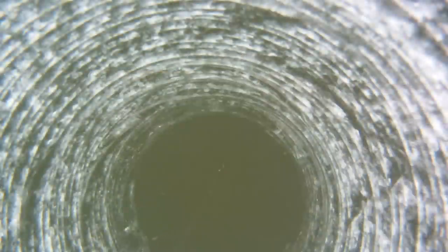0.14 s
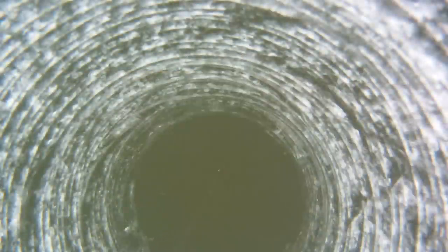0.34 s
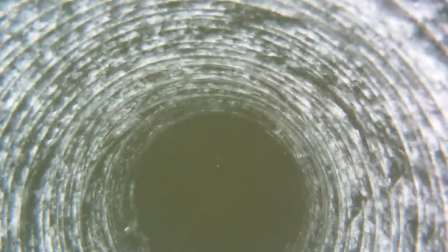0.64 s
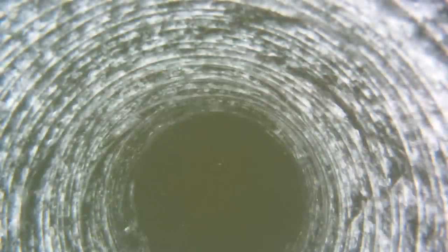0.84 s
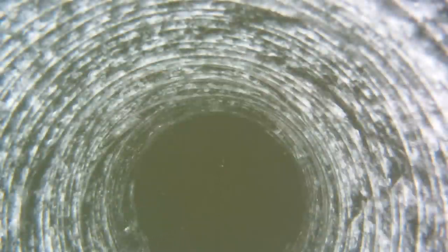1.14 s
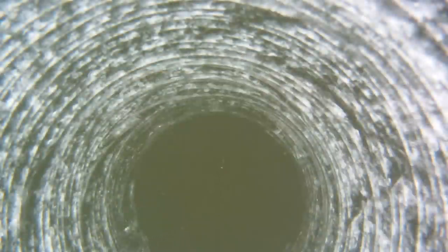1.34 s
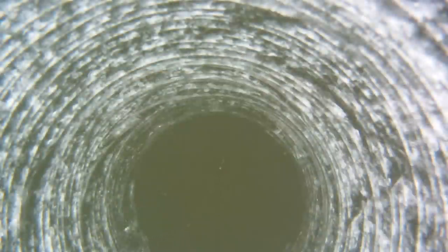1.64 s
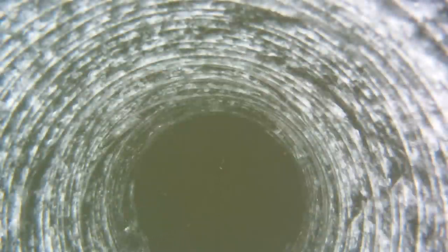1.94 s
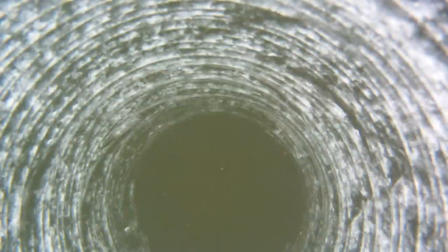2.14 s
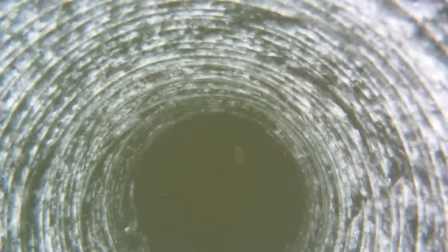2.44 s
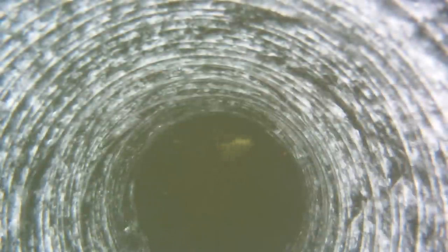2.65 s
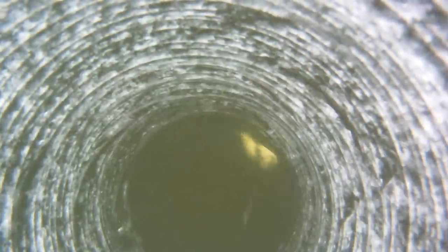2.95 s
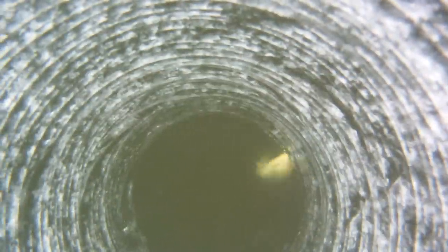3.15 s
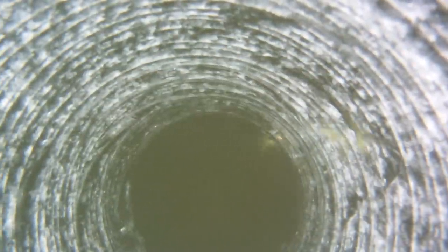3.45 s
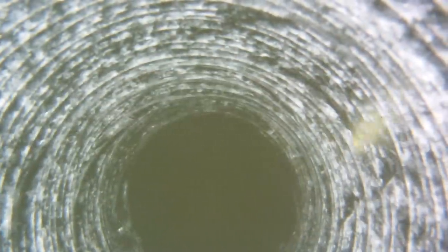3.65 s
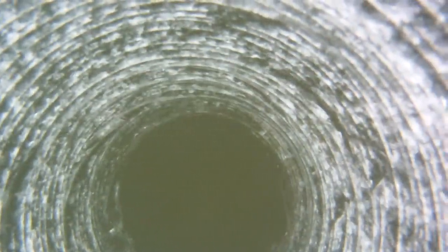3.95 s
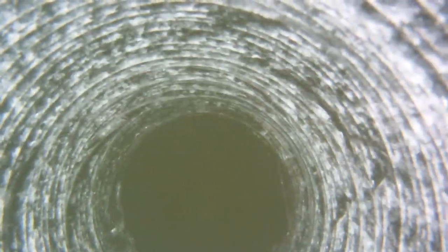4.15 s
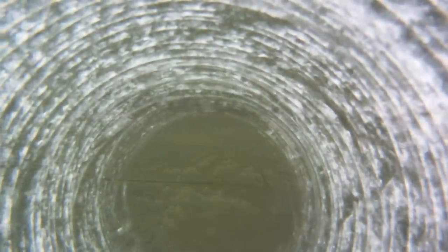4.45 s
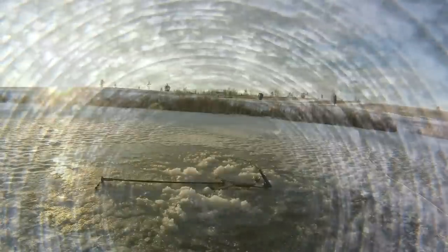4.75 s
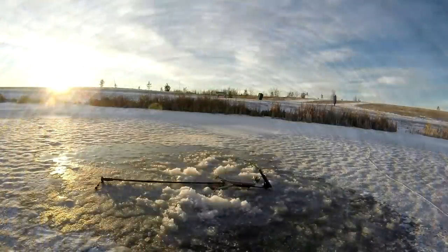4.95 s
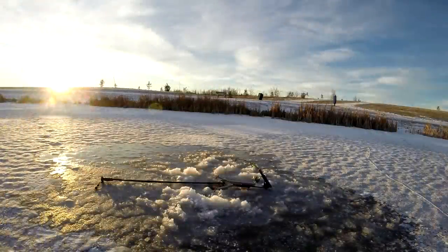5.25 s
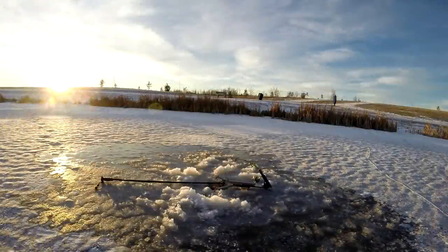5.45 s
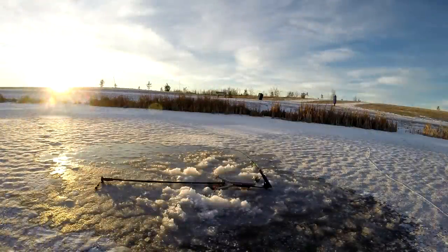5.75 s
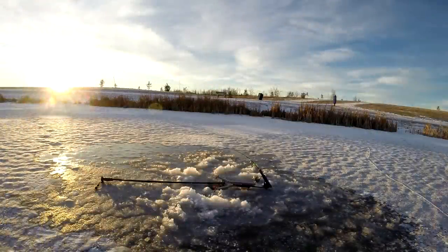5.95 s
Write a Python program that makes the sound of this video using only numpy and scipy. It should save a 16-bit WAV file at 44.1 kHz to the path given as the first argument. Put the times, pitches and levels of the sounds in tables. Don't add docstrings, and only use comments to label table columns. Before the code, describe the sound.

At an ice-fishing hole, very soft hiss and a few barely audible taps. Suddenly the rod jerks with hard cracks, bright bell jingle and rough scraping, then drags and rattles more quietly with scattered tinkles and low thumps through the close microphone's mount. The sound crossfades to a distant hum over an open frozen pond, where the rod trips with a clatter and the bell clinks sharply and rings on.

```python
import sys
import numpy as np
from scipy import signal
from scipy.fft import rfft, irfft
from scipy.io import wavfile
from scipy.ndimage import uniform_filter1d

SR = 44100
rng = np.random.default_rng(int(sys.argv[2]) if len(sys.argv) > 2 else 0)


def transcribe(signal):
    frames = np.atleast_2d(signal).T
    limited = np.clip(frames, -1, 1)
    pcm = np.round(limited * 32767).astype(np.int16)
    wavfile.write(sys.argv[1], SR, pcm)


def to_linear_factor(level_db):
    exponent = np.asarray(level_db, float) / 20
    return 10 ** exponent


N = 268561


def evened(x):
    return x / np.sqrt(np.mean(x ** 2) + 1e-20)


def add(mix, s, sound):
    part = mix[round(s * SR):][:len(sound)]
    part += sound[:len(part)]


def resonate(x, hz, width):
    r = np.exp(-np.pi * width / SR)
    return signal.lfilter([1 - r], [1, -2 * r * np.cos(2 * np.pi * hz / SR), r * r], x)


RIM_HZ = 7000
LINGER_DB = -27


def ring_shell(strikes, modes, free_s):
    out, t = np.zeros(N), np.arange(6000) / SR
    waits = np.diff([row[0] for row in strikes] + [np.inf])
    damped_db = np.maximum(-60 * np.maximum(t - free_s, 0) / 0.04, LINGER_DB)
    decay_db = -60 * t / 0.11
    attack = np.sin(np.pi / 2 * np.minimum(t / 0.0015, 1)) ** 2
    for (s, db), wait in zip(strikes, waits):
        detune = 1 + 0.008 * (rng.random() - 0.5)
        ring = np.zeros(len(t))
        for hz, mode_db in modes:
            level_db = mode_db + damped_db * (hz < RIM_HZ)
            ring += to_linear_factor(level_db) * np.sin(2 * np.pi * (hz * detune * t + rng.random()))
        until_next = np.clip((wait - t) / 0.0015 + 1, 0, 1)
        add(out, s - 0.001, to_linear_factor(db + decay_db) * ring * attack * until_next)
    flutter = uniform_filter1d(uniform_filter1d(rng.standard_normal(N), size=120), size=120)
    return out * to_linear_factor(2.5 * evened(flutter))


# (frequency [Hz], level [dB])
LOW_SHELL_MODES = [(3860, 0), (3890, -8), (9460, -29), (7990, -39)]
HIGH_SHELL_MODES = [(4104, 0), (4076, -8), (10150, -28), (10310, -31), (8130, -37)]
# (time [s], peak level [dB])
LOW_TOUCHES = [
    (2.2845, -62),
    (2.3426, -55),
    (2.3989, -64),
]
LOW_STRIKES_JERK = [(2.5945, -18.5), (2.6061, -18), (2.6229, -22), (2.7784, -39), (2.7944, -38),
                    (2.834, -42), (2.8534, -44), (2.877, -47), (2.957, -55), (3.123, -37), (3.183, -58),
                    (3.203, -46), (3.331, -44), (3.3464, -49)]
LOW_STRIKES_REEL = [(3.418, -41), (3.5464, -36), (3.567, -41), (3.588, -43.5), (3.7409, -45), (3.767, -43),
                    (3.872, -39), (3.8923, -33), (3.923, -34), (3.9304, -30), (3.986, -39), (3.9984, -48),
                    (4.0568, -50), (4.107, -37), (4.1355, -29.5), (4.1782, -32.5), (4.243, -41.5),
                    (4.2844, -35), (4.3024, -30.5), (4.348, -51), (4.4333, -39.5), (4.478, -33)]
LOW_STRIKES_SETTLE = [
    (4.6162, -28),
    (4.6506, -31),
    (4.67, -31),
    (4.682, -33.5),
    (4.72, -43),
    (4.737, -44.5),
    (4.765, -51),
    (4.782, -49),
    (4.797, -47),
    (4.8527, -52),
]
# (time [s], peak level [dB])
HIGH_STRIKES_NEAR = [(2.597, -23.5), (2.6205, -34), (2.7577, -50), (2.793, -39), (2.809, -40),
                     (2.8539, -50), (3.9693, -48), (4.1343, -50), (4.1514, -37.5), (4.1786, -34),
                     (4.2448, -45), (4.6179, -57), (4.632, -40), (4.8144, -57)]


def near_bell():
    low, high = LOW_SHELL_MODES[:2], HIGH_SHELL_MODES[:2]
    out = ring_shell(LOW_TOUCHES, low, free_s=0.0023)
    out += ring_shell(LOW_STRIKES_JERK + LOW_STRIKES_REEL + LOW_STRIKES_SETTLE, low, free_s=0.0091)
    return out + ring_shell(HIGH_STRIKES_NEAR, high, free_s=0.044)


# (time [s], peak level [dB])
LOW_STRIKES_WIDE = [(5.4281, -61), (5.4849, -58), (5.7325, -24), (5.7378, -12), (5.7478, -18),
                    (5.7648, -19), (5.7705, -19), (5.7846, -30.5), (5.8137, -33), (5.8493, -30.5),
                    (5.861, -28), (5.8665, -23.5), (5.8985, -30.5), (5.9104, -35), (5.923, -33),
                    (5.9372, -45), (5.9675, -35), (5.995, -38), (6.03, -43), (6.0448, -38), (6.0604, -42),
                    (6.0744, -36)]
HIGH_STRIKES_WIDE = [(5.738, -20), (5.7522, -29), (5.7618, -35), (5.7884, -32), (5.821, -39), (5.8556, -29),
                     (5.8794, -25.5), (5.8978, -28), (5.9366, -28.5), (5.9697, -33), (5.996, -38.5),
                     (6.028, -44), (6.0487, -39), (6.0672, -47)]


def wide_bell():
    out = ring_shell(LOW_STRIKES_WIDE, LOW_SHELL_MODES, free_s=0.0094)
    return out + ring_shell(HIGH_STRIKES_WIDE, HIGH_SHELL_MODES, free_s=0.047)


def response(body, widen, tick_db):
    t = np.arange(2048) / SR
    modes = []
    for k, (hz, width, db) in enumerate(body):
        decay = np.exp(-np.pi * width * widen * t)
        modes.append((-1) ** k * to_linear_factor(db) * width * decay * np.sin(2 * np.pi * hz * t))
    modes = np.array(modes)
    tick = to_linear_factor(tick_db) * np.diff(t == 0, prepend=0)
    return np.vstack([modes / np.linalg.norm(modes.sum(0)), tick])


CRACK_DB = -3.5


def knock(knocks, body, rattle_s=0.024, widen=0.77, tick_db=-14, own_db=-2, own_width=160, lift_db=-2):
    modes, out, t = response(body, widen, tick_db), np.zeros(N), np.arange(4000) / SR
    for s, db, hz, *own_t60 in knocks:
        t60 = own_t60[0] if own_t60 else rattle_s
        blow = rng.standard_normal(len(t)) * to_linear_factor(-60 * t / max(t60, 0.004))
        blow[:8] += to_linear_factor(CRACK_DB) * np.linalg.norm(blow) * np.hanning(8) / 2
        ring = to_linear_factor(3 * rng.standard_normal(len(modes))) @ modes
        sound = evened(signal.fftconvolve(blow, ring)[:len(t)])
        own_ring = resonate(resonate(blow, hz, 2 * own_width), hz, 2 * own_width)
        sound += to_linear_factor(own_db) * evened(own_ring)
        add(out, s - 0.0004, to_linear_factor(db + lift_db) * sound / abs(sound).max())
    return out


GRIP_S, LIFT_S, LIGHT_DB = 0.014, 0.014, -30


def pressure(strokes):
    out = np.zeros(N)
    for start, end, grip_db, lift_db in strokes:
        t = np.arange(start, end + LIFT_S, 1 / SR)
        times = [start, start + GRIP_S, end, end + LIFT_S]
        levels_db = [grip_db + LIGHT_DB, grip_db, lift_db, lift_db + LIGHT_DB]
        add(out, start, to_linear_factor(np.interp(t, times, levels_db)))
    return out


SLIP_SPREAD_DB, SLIPS_PER_S = 3.6, 3500


def slide(strokes, body, widen, tick_db, slide_db):
    modes = response(body, widen, tick_db)
    start = strokes[0][0]
    span = round((strokes[-1][1] - start) * 10 + 2) * 4500
    slips = to_linear_factor(SLIP_SPREAD_DB * np.minimum(rng.exponential(1, span), 3))
    slips *= rng.random(span) < SLIPS_PER_S / SR
    slips *= rng.choice([-1., 1.], span)
    wander = uniform_filter1d(rng.standard_normal((len(modes), span // 100)), size=7)
    wander_db = 2.7 * np.repeat(evened(wander), 100, axis=1)
    scrape = signal.oaconvolve(slips * to_linear_factor(wander_db), modes, axes=1)[:, :span].sum(0)
    sliding = np.zeros(N)
    add(sliding, start, evened(scrape))
    return pressure(strokes) * to_linear_factor(slide_db) * sliding


# (frequency [Hz], width [Hz], level [dB])
JERK_RESONANCES = [(980, 18.4, 7), (1150, 51, -19), (1320, 29, 7.5), (2030, 227, 8), (2260, 94, 13),
                   (3586, 206, 13.5), (3633, 104, 13.5), (4740, 510, -5)]
# (time [s], peak level [dB], loudest ring [Hz], rattle t60 [s])
JERK_BLOWS = [(2.545, -32, 2870, 0.025), (2.551, -10, 3330, 0.036), (2.5903, 1.5, 3400, 0.018),
              (2.5945, -7.5, 2090, 0.011), (2.626, -12, 1320, 0.1), (2.645, -14, 1700, 0.028),
              (2.672, -17, 3570, 0.018), (2.708, -21, 2270, 0.035), (2.714, -16.5, 1510, 0.02),
              (2.724, -15, 2200, 0.016), (2.741, -3.5, 2235, 0.06), (2.748, -5.5, 1224, 0.011),
              (2.7588, -15, 1460, 0.018), (2.766, -14, 1580, 0.018), (2.81, -28.5, 2130, 0.015),
              (2.819, -30.5, 3670, 0.086), (2.838, -33.5, 3670, 0.036), (2.856, -35, 2400, 0.016),
              (2.875, -39, 2150, 0.0088)]
# (time [s], peak level [dB], loudest ring [Hz])
JERK_SMALL_CATCHES = [(2.565, -30.5, 980), (2.57, -29, 1750), (2.583, -17, 1920), (2.607, -32, 3010),
                      (2.62, -28, 2320), (2.657, -24, 1720), (2.688, -24.5, 1410), (2.72, -14.5, 1820),
                      (2.736, -19, 2280), (2.745, -8, 1340), (2.77, -18.5, 1800), (2.777, -23, 3540)]
# (start [s], end [s], level on gripping [dB], level on lifting [dB])
JERK_STROKES = [
    (2.536, 2.598, -24, -38.5),
    (2.595, 2.648, -31.5, -26),
    (2.65, 2.706, -36.5, -39),
    (2.697, 2.761, -30.5, -29.5),
    (2.745, 2.792, -30, -46),
    (2.786, 2.868, -64, -63),
]


def jerk():
    out = knock(JERK_BLOWS, JERK_RESONANCES, widen=2.54, tick_db=-6.5)
    out += slide(JERK_STROKES, JERK_RESONANCES, widen=2.54, tick_db=-6.5, slide_db=3)
    out += knock(JERK_SMALL_CATCHES, JERK_RESONANCES, rattle_s=0.012, widen=1.5, tick_db=-18, own_db=7, lift_db=0)
    return signal.lfilter(*signal.butter(1, 800, "high", fs=SR), out)


# (frequency [Hz], width [Hz], level [dB])
DRAG_RESONANCES = [(720, 18, -1.5), (920, 70, 2), (1380, 120, 2), (2280, 225, 2.5), (3780, 130, 3.5),
                   (4500, 3100, -10), (5070, 360, -19)]
# (time [s], peak level [dB], loudest ring [Hz], rattle t60 [s])
DRAG_BLOWS = [(2.89, -18, 2110, 0.013), (2.917, -24, 2360, 0.073), (2.9325, -9.5, 2130, 0.022),
              (2.945, -18, 805, 0.03), (2.958, -19, 680, 0.28), (2.982, -7.5, 2280, 0.055),
              (3.021, -16, 2030, 0.039), (3.062, -24, 2150, 0.077), (3.079, -9.5, 2260, 0.015),
              (3.1025, -10.5, 2180, 0.028), (3.1088, -11.5, 2130, 0.011), (3.132, -10.5, 2180, 0.017),
              (3.145, -15.5, 1730, 0.065), (3.289, -35, 2260, 0.03), (3.306, -22, 2100, 0.011)]
# (time [s], peak level [dB], loudest ring [Hz])
DRAG_SMALL_CATCHES = [(2.896, -36, 2170), (2.97, -43, 890), (2.989, -32, 2160), (3.001, -39, 2270),
                      (3.029, -31, 2160), (3.038, -33, 780), (3.047, -42, 1590), (3.051, -37, 2290),
                      (3.066, -31, 2310), (3.097, -54, 2380), (3.125, -28, 2130), (3.154, -31, 2280),
                      (3.158, -24, 1980), (3.166, -24, 2200), (3.18, -42, 2330), (3.186, -40, 2200),
                      (3.193, -35, 2020), (3.2, -33, 2220), (3.21, -27, 2100), (3.225, -25, 2020),
                      (3.234, -33, 2400), (3.246, -26, 2280), (3.254, -24.5, 2120), (3.269, -50, 2300),
                      (3.278, -45, 2000)]
# (start [s], end [s], level on gripping [dB], level on lifting [dB])
DRAG_STROKES = [
    (2.886, 3.076, -28, -34.5),
    (3.044, 3.141, -39.5, -26.5),
]


def drag():
    out = knock(DRAG_BLOWS, DRAG_RESONANCES, widen=1.54, tick_db=-3.5, own_db=-2.5)
    out += slide(DRAG_STROKES, DRAG_RESONANCES, widen=1.54, tick_db=-3.5, slide_db=-6)
    out += knock(DRAG_SMALL_CATCHES, DRAG_RESONANCES, rattle_s=0.014, widen=1.9, tick_db=-6, own_db=1.5, lift_db=1.5)
    return signal.lfilter(*signal.butter(2, [520, 5000], "band", fs=SR), out)


# (start [s], end [s], level on gripping [dB], level on lifting [dB])
SKID_STROKES = [
    (3.132, 3.31, -37.5, -35),
]


def skid():
    return slide(SKID_STROKES, DRAG_RESONANCES[2:], widen=2.6, tick_db=-5.5, slide_db=-1.5)


# (frequency [Hz], width [Hz], level [dB])
REEL_RESONANCES = [(705, 75, 4.5), (1110, 60, 1.5), (1340, 61, 3), (2110, 123, 8.5), (3030, 28, 1.5),
                   (3863, 460, 2.5), (4950, 330, -9), (380, 370, -4.5)]
# (time [s], peak level [dB], loudest ring [Hz])
REEL_BLOWS = [(3.367, -35, 2200), (3.452, -33, 2260), (3.481, -35, 2220), (3.502, -26, 2280),
              (3.618, -22, 2055), (3.9215, -16, 2140), (3.96, -20, 2340), (3.977, -26, 680),
              (4.073, -21.5, 705), (4.089, -21, 680), (4.115, -19.5, 1970), (4.1365, -15.5, 1980),
              (4.181, -34, 1380), (4.2775, -20.5, 2116), (4.324, -26, 720), (4.352, -25, 2060),
              (4.389, -24, 1150), (4.534, -27.5, 1350), (4.697, -14.5, 2050), (4.7035, -16, 1850),
              (4.412, -29, 2030), (4.834, -41, 2370)]
# (time [s], peak level [dB], loudest ring [Hz])
REEL_SMALL_CATCHES = [(3.362, -49, 1980), (3.375, -46, 2180), (3.407, -33.5, 2180), (3.416, -41, 2200),
                      (3.425, -58, 2160), (3.448, -31, 2260), (3.488, -43, 2040), (3.497, -29, 2030),
                      (3.544, -33, 2130), (3.549, -36, 2110), (3.56, -33, 2110), (3.589, -38, 2280),
                      (3.604, -34, 2240), (3.614, -28.5, 1860), (3.631, -40, 1950), (3.639, -34, 1900),
                      (3.654, -36, 2210), (3.673, -38, 2100), (3.68, -30.5, 2130), (3.691, -39, 2120),
                      (3.697, -46, 2170), (3.705, -43, 2120), (3.714, -43, 2390), (3.74, -43, 2042),
                      (3.77, -33, 2030), (3.777, -33, 2160), (3.788, -37, 2280), (3.794, -31.5, 2140),
                      (3.801, -43, 2100), (3.813, -40, 2040), (3.86, -51, 2130), (3.864, -51, 2200),
                      (3.893, -30, 2180), (3.903, -25, 2080), (3.965, -30, 2400), (3.983, -38, 2190),
                      (4.003, -35.5, 1930), (4.05, -39, 2120), (4.055, -31, 1910), (4.063, -33, 2260),
                      (4.096, -32, 2110), (4.118, -42, 1860), (4.188, -32.5, 980), (4.195, -38, 1320),
                      (4.204, -42, 2120), (4.215, -41, 2030), (4.226, -44, 1990), (4.258, -35, 1050),
                      (4.27, -34, 2030), (4.304, -31, 2160), (4.312, -35, 2110), (4.32, -37, 740),
                      (4.327, -29, 720), (4.336, -47, 2000), (4.396, -30, 1150), (4.399, -32, 1110),
                      (4.416, -26, 2050), (4.442, -34, 1980), (4.451, -41, 2110), (4.464, -36, 2100),
                      (4.486, -34, 2160), (4.493, -42, 2170), (4.501, -39, 970), (4.528, -38, 2100),
                      (4.548, -39, 2140), (4.557, -43, 2063), (4.582, -35, 2110), (4.59, -44, 1980),
                      (4.608, -56, 2080), (4.627, -39, 2000), (4.637, -45, 2100), (4.648, -47, 1960),
                      (4.656, -60, 730), (4.667, -44, 2070), (4.679, -38, 2010), (4.686, -35, 925)]
# (start [s], end [s], level on gripping [dB], level on lifting [dB])
REEL_STROKES = [(3.347, 3.459, -48.5, -48.5), (3.461, 3.51, -54, -47), (3.515, 3.603, -42.5, -48),
                (3.616, 3.714, -42.5, -48), (3.718, 3.751, -48, -42.5), (3.75, 4.007, -52.5, -31.5),
                (3.996, 4.13, -45.5, -34.5), (4.134, 4.159, -30.5, -46), (4.16, 4.227, -46, -39.5),
                (4.234, 4.359, -48, -35), (4.362, 4.392, -43, -31), (4.398, 4.497, -36.5, -47.5),
                (4.51, 4.72, -42, -55.5)]


def reel():
    catches = REEL_SMALL_CATCHES
    out = knock(REEL_BLOWS, REEL_RESONANCES, widen=1.0, tick_db=-8, own_db=2.5)
    out += slide(REEL_STROKES, REEL_RESONANCES, widen=1.0, tick_db=-8, slide_db=1.5)
    out += knock(catches, REEL_RESONANCES, rattle_s=0.058, widen=1.4, tick_db=-6, own_db=2.5, lift_db=0.5)
    return signal.lfilter(*signal.butter(2, 480, "high", fs=SR), out)


# (time [s], peak level [dB], frequency [Hz])
BLANK_RINGS = [
    (2.5905, -14.5, 2100),
    (2.7415, -8, 1340),
    (2.983, -18, 1800),
    (3.073, -28, 790),
    (3.08, -27.5, 936),
    (3.103, -30, 1050),
]


def blank_rings():
    return knock(BLANK_RINGS, JERK_RESONANCES[2:3], rattle_s=0.025, own_db=16, own_width=53)


# (time [s], peak level [dB], centre [Hz])
ICE_SNAPS = [
    (2.5522, -4.5, 4630),
    (2.7585, -10, 4200),
    (3.1088, -8, 4500),
    (3.1225, -19, 4350),
    (3.4805, -34, 3600),
    (3.9785, -24, 3000),
    (4.1372, -35, 4200),
]


def ice_snaps():
    return knock(ICE_SNAPS, JERK_RESONANCES[3:], rattle_s=0.006, widen=3, tick_db=3, own_db=-3, own_width=900)


# (time [s], peak level [dB], loudest ring [Hz])
EARLY_KNOCKS = [
    (0.929, -56, 2280),
    (1.509, -55, 1005),
    (1.53, -47.5, 960),
    (1.557, -53, 937),
    (1.999, -57, 2320),
]


def early_knocks():
    return knock(EARLY_KNOCKS, DRAG_RESONANCES, rattle_s=0.18, own_db=2, own_width=69)


# (frequency [Hz], width [Hz], level [dB])
TRIP_RESONANCES = [(1060, 54, 1.5), (1380, 353, -3.5), (1570, 100, -8.5), (2210, 64, -7.5), (2480, 53, 0.5),
                   (2650, 42, -13), (3280, 170, -5)]
ICE_RESONANCES = [(4320, 500, 12), (5500, 680, 6.5), (6350, 230, 6.5), (6920, 82, 4), (9300, 460, 1),
                  (10600, 500, -5.5), (12500, 800, -5.5)]
# (time [s], peak level [dB], loudest ring [Hz])
TRIP_BLOWS = [(5.686, -28, 1460), (5.695, -11, 1380), (5.702, -15, 3330), (5.711, -21, 2480),
              (5.743, -15, 1000), (5.751, -12.5, 1340), (5.772, -11.5, 1000), (5.784, -16, 1230),
              (5.814, -25, 2300), (5.837, -28, 990), (5.86, -39, 869), (5.922, -21, 3280),
              (5.962, -33, 3280), (5.981, -33, 940)]
TRIP_SMALL_CATCHES = [(5.689, -34, 2260), (5.706, -20, 2380), (5.72, -26, 1040), (5.794, -30, 1230),
                      (5.799, -29, 1060), (5.81, -31, 1060), (5.819, -28.5, 2360), (5.847, -37, 1260),
                      (5.862, -42, 1290), (5.881, -41, 910), (5.891, -39, 856)]
# (time [s], peak level [dB], loudest ring [Hz])
BRIGHT_ICE_TICKS = [
    (5.0678, -40, 6000),
    (5.6965, -12.5, 5400),
    (5.7264, -38, 5500),
    (5.7324, -25, 5800),
    (5.7736, -22.5, 6800),
    (5.8556, -32.5, 9500),
    (5.98, -39, 6140),
    (5.921, -23.5, 6900),
    (5.9618, -36, 6040),
]
# (start [s], end [s], level on gripping [dB], level on lifting [dB])
TRIP_STROKES = [
    (5.676, 5.824, -27, -36.5),
    (5.825, 5.907, -34.5, -60),
]


def trip():
    out = knock(TRIP_BLOWS, TRIP_RESONANCES, rattle_s=0.06, widen=1.47, tick_db=-38)
    out += slide(TRIP_STROKES, TRIP_RESONANCES, widen=1.47, tick_db=-38, slide_db=-4)
    out += knock(TRIP_SMALL_CATCHES, TRIP_RESONANCES, rattle_s=0.011, widen=1.0, tick_db=-30, own_db=13, lift_db=3.5)
    out += knock(BRIGHT_ICE_TICKS, ICE_RESONANCES, rattle_s=0.038, widen=1.54, tick_db=-19, own_db=-5, own_width=170)
    return out + slide(TRIP_STROKES, ICE_RESONANCES, widen=1.54, tick_db=-19, slide_db=-11)


# (start [s], end [s], sway level [dB], housing level [dB])
MOUNT_TREMBLE = (3.5, 5, -58, -55.5)


def tremble():
    start, end, sway_db, housing_db = MOUNT_TREMBLE
    shake = rng.standard_normal((2, N))
    sway = evened(resonate(resonate(shake[0], 54, 30), 54, 30))
    housing = evened(resonate(resonate(shake[1], 233.3, 81), 314, 62))
    moving = np.interp(np.arange(N) / SR, [start, start + 0.016, end, end + 0.038], [0, 1, 1, 0])
    return moving * (to_linear_factor(sway_db) * sway + to_linear_factor(housing_db) * housing)


# (time [s], sway level [dB], housing level [dB])
MOUNT_JOLTS = [(2.552, -36.5, -64), (2.661, -35, -48), (2.744, -32, -28), (2.96, -34, -32.5),
               (3.097, -37, -35.5), (3.199, -68, -41), (3.419, -57, -45.5), (3.481, -37, -38),
               (3.609, -70, -44.5), (3.709, -42, -55), (3.759, -46, -46), (3.814, -48, -40),
               (3.9, -52, -38), (3.961, -34, -40.5), (4.019, -23, -26), (4.077, -47, -33.5),
               (4.152, -43, -36.5), (4.199, -46, -36), (4.247, -27.5, -40), (4.288, -29, -30),
               (4.389, -33.5, -40), (4.544, -60, -36.5), (4.701, -31.5, -28)]
# (frequency [Hz], rise [s], t60 [s])
MOUNT_SWAY = (54.5, 0.047, 0.31)
MOUNT_HOUSING = (245, 0.01236, 0.22)


def jolts():
    out, t = np.zeros(N), np.arange(12000) / SR
    for s, *dbs in MOUNT_JOLTS:
        detune, phase = 1 + 0.05 * (rng.random() - 0.5), rng.random()
        for (hz, rise, t60), db in zip((MOUNT_SWAY, MOUNT_HOUSING), dbs):
            ring = np.sin(2 * np.pi * (hz * detune * t + phase))
            add(out, s - rise / 2, to_linear_factor(db - 60 * t / t60) * np.minimum(t / rise, 1) * ring)
    return out


# (time [s], peak level [dB], frequency [Hz])
MOUNT_THUMPS = [(2.549, -40, 127), (2.654, -38, 320), (2.741, -34, 120), (2.915, -37, 194),
                (2.957, -30.5, 115.5), (3.019, -34, 180), (3.093, -33.5, 149), (3.18, -32, 195),
                (3.185, -30, 348), (3.209, -37, 93), (3.401, -45.5, 97), (3.5, -42, 101), (3.749, -50, 90),
                (4.008, -29.5, 298), (4.089, -43, 100), (4.139, -40.5, 110), (4.271, -39, 95),
                (4.409, -40.5, 99), (4.694, -38, 282)]


def thumps():
    out, t = np.zeros(N), np.arange(12000) / SR
    for s, db, hz in MOUNT_THUMPS:
        push = rng.standard_normal(len(t)) * to_linear_factor(-60 * t / 0.08)
        thump = resonate(resonate(push, hz, 160), hz, 260)
        add(out, s - 0.003, to_linear_factor(db) * thump / abs(thump).max())
    return out


HOLD_HZ = 12000


def held(x):
    hz = np.fft.rfftfreq(N, 1 / SR)
    rolloff = 1 / np.sqrt(1 + (hz / 5500) ** 24)
    low = irfft(rfft(x) * rolloff * np.clip((HOLD_HZ / 2 - hz) / 150, 0, 1), N)
    mirrored = low * (1 + 2 * np.cos(2 * np.pi * HOLD_HZ * np.arange(N) / SR))
    return irfft(rfft(mirrored) * np.sinc(hz / HOLD_HZ) / np.sinc(hz / (HOLD_HZ * 4)), N)


def noise(spectrum, patchy_db):
    hz, (f, db) = np.fft.rfftfreq(1024, 1 / SR), np.transpose(spectrum)
    a, b, patches = rng.standard_normal((N // 256 + 5, 513, 3)).T
    patches = evened(uniform_filter1d(uniform_filter1d(patches, 10, 0), 12, 1))
    colour_db = np.interp(np.log(hz + 1), np.log(f + 1), db)[:, None]
    spectra = (a + 1j * b) * to_linear_factor(colour_db + patchy_db * patches)
    return evened(signal.istft(spectra, nperseg=1024, noverlap=768)[1][:N])


# (frequency [Hz], density [dB per Hz])
HISS_COLOUR = [(15, -36), (25, -3.5), (201, -5), (271, -8), (429, -9.5), (1210, -15), (2290, -17.5),
               (4990, -21), (6000, -23), (7800, -58), (13200, -120)]


def hiss():
    return to_linear_factor(-63.5) * noise(HISS_COLOUR, patchy_db=1.2)


# (frequency [Hz], level [dB])
THROB_PARTIALS = [(4707, -60), (9414, -72), (14120, -78)]
THROB_HZ = 30


def throb():
    t = np.arange(N) / SR
    gate = uniform_filter1d(1. * ((t - 4.792) * THROB_HZ % 1 < 0.4), 130)
    wobble = np.cumsum(rng.standard_normal(N)) * 0.002
    whine = np.zeros(N)
    for k, (hz, db) in enumerate(THROB_PARTIALS, 1):
        whine += to_linear_factor(db) * np.sin(2 * np.pi * (hz * t + k * wobble))
    return gate * whine


# (time [s], level [dB])
ELECTRIC_PIPS = [
    (4.891, -64),
    (5.228, -62),
]


def pips():
    out, t = np.zeros(N), np.arange(1050) / SR
    tone = np.sin(2 * np.pi * 5281 * t) + np.sin(4 * np.pi * 5281 * t)
    pip = tone * signal.windows.tukey(len(t), 0.2)
    for s, db in ELECTRIC_PIPS:
        add(out, s, to_linear_factor(db) * pip)
    return out


# (frequency [Hz], density [dB per Hz])
POND_COLOUR = [(15, -43), (25, -1), (84, -1.5), (288, -13.5), (329, -12.5), (479, -20.5), (736, -10),
               (989, -14), (1400, -30), (4330, -38), (4700, -37), (6480, -40.5), (15300, -51.5)]


def pond():
    return to_linear_factor(-40.5) * noise(POND_COLOUR, patchy_db=1.0)


# (start [s], end [s])
CROSSFADE = (4.44, 5.124)


def scene():
    wide = np.interp(np.arange(N) / SR, CROSSFADE, [0, 1])
    near = near_bell() + jerk() + drag() + skid() + reel()
    near += blank_rings() + ice_snaps() + early_knocks()
    near += tremble() + jolts() + thumps()
    near += (1 - wide) * hiss()
    far = wide_bell() + trip()
    background = wide * (throb() + pips() + pond())
    return (held(near) + far + background)[None]


def roll_off(x):
    return signal.sosfilt(signal.butter(12, 15700, fs=SR, output="sos"), x)


def record(dry):
    lowpass = signal.firwin(301, 15330, fs=SR)[None]
    mix = signal.oaconvolve(dry, lowpass, "same")
    return roll_off(mix)


dry = scene()
out = record(dry)
transcribe(out)
```